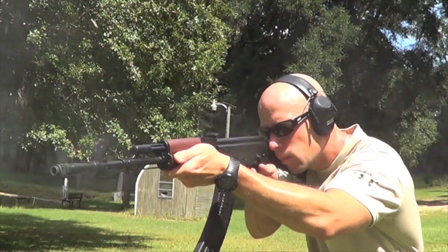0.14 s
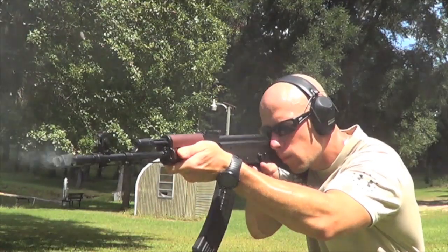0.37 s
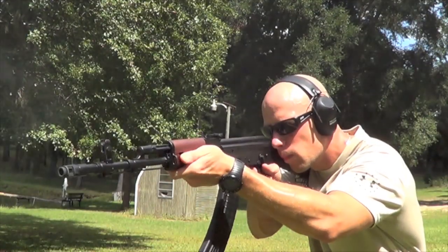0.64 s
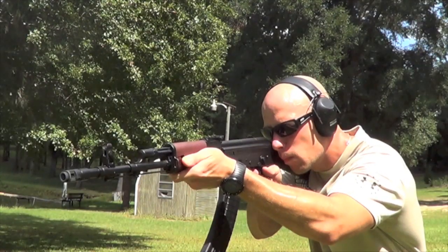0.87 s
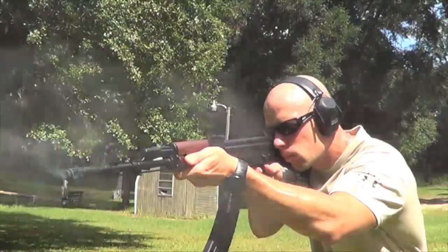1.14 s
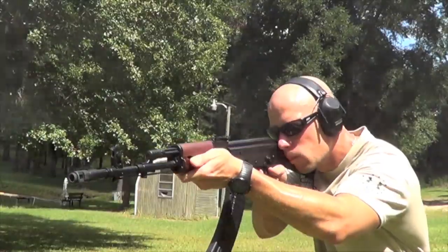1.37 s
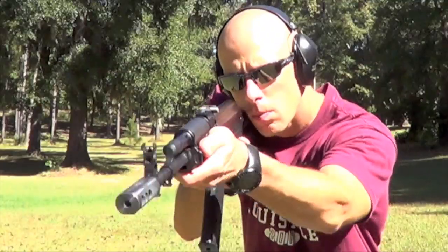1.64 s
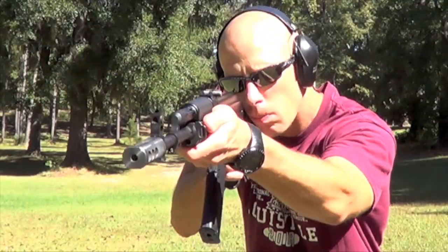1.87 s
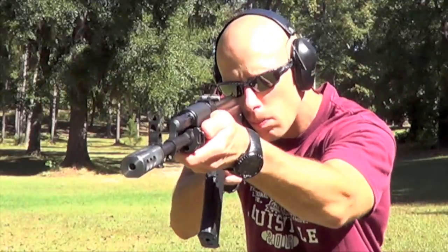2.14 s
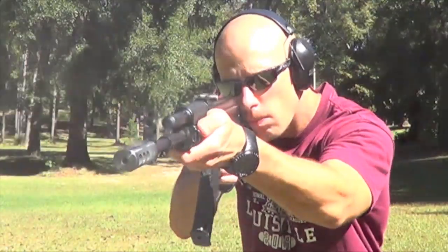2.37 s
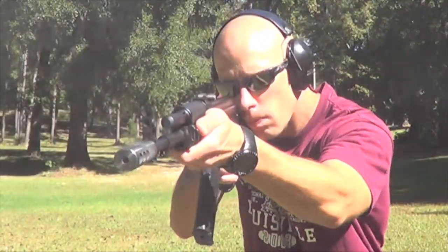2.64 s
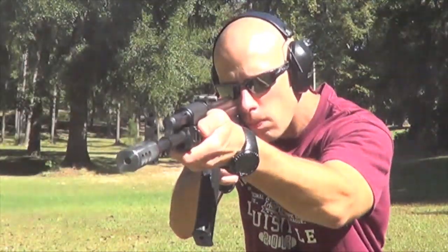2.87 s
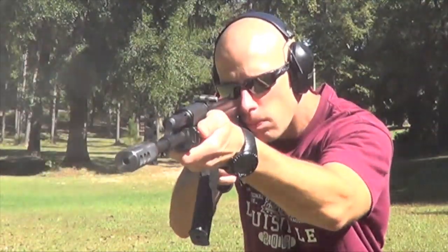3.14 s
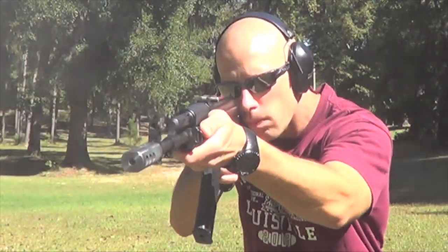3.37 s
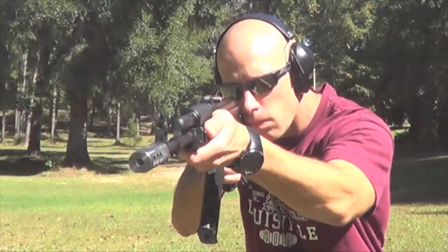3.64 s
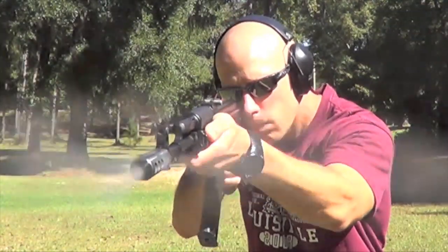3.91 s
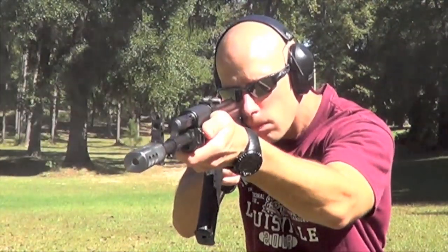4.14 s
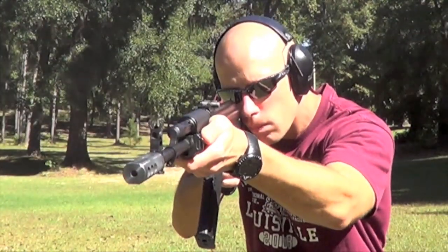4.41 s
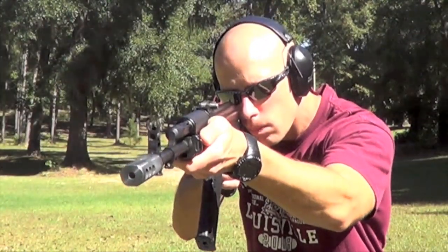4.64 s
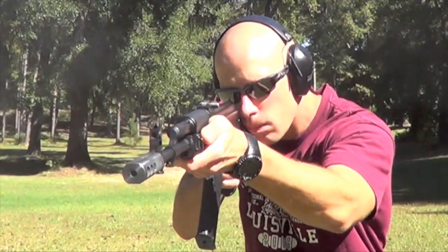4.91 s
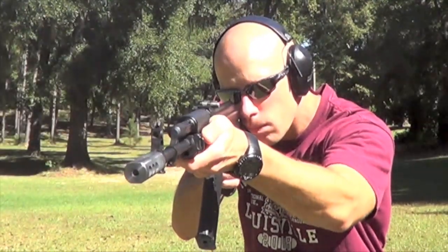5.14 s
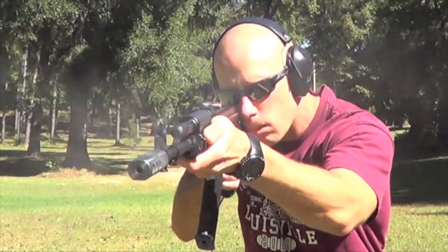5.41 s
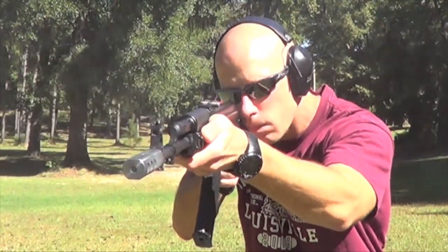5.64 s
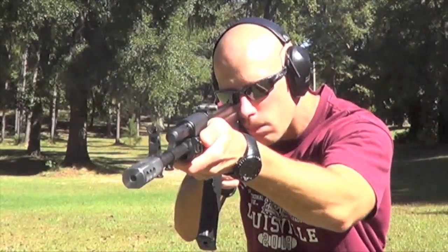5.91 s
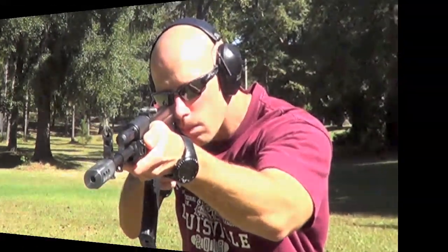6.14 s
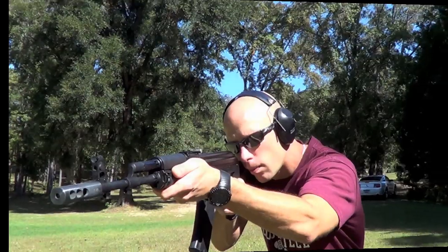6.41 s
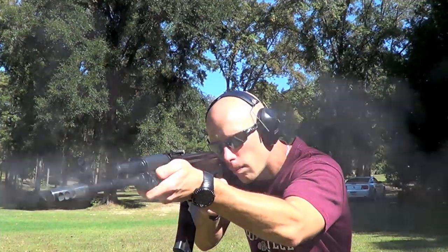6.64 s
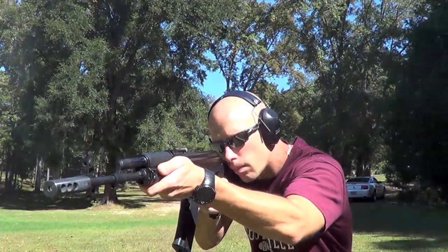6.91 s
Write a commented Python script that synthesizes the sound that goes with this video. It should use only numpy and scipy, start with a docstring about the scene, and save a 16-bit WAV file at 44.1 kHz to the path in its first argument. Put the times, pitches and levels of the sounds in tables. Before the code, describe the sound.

The sound begins inside the fading echo of a rifle shot, with a small steel click. Shots crack at about 0.24 and 0.47 s, then 1.1 and 1.3 s. Each is a tiny hammer click and bright, ragged gas burst, followed within a tenth of a second by hissy steel action clacks, dull slaps and a long woodland echo. Around 1.6 s the view fades to another; a crisp handling clack at 1.74 s echoes softly. Pairs follow at 2.36 and 2.56, then 3.11 and 3.34 s, with singles at 4.08, 4.84 and a stronger one at 5.53 s. Small trigger clicks punctuate gaps. Another fade spans 6.1-6.55 s, with a metal clack, quiet air, soft bumps and faint falling chirps near 6.7 s. A final shot at 6.8 s rings away. The camera's gain ducks at blasts and climbs afterward, sustaining the echoes.

```python
"""Rifle shots on a lawn among trees

A rifle fires quick single shots, heard from three camera set-ups joined by fades. Each shot is a
hammer click and a burst of gas made from coloured noise, then short slaps and a long echo from the woods.
Steel parts clack between shots, as noise through resonances; soft low bumps, a bird and quiet air lie behind.
The camera's gain control drops at loud sounds and climbs back, which holds the dying echo level."""
import sys
import numpy as np
from scipy import signal
from scipy.fft import rfft, irfft, next_fast_len
from scipy.io import wavfile
from scipy.ndimage import uniform_filter1d, map_coordinates

SR = 44100
rng = np.random.default_rng(int(sys.argv[2]) if len(sys.argv) > 2 else 0)


def gain_from_db(level_db):
    """Turn a decibel level (scalar or array-like) into a linear amplitude factor."""
    decades = np.asarray(level_db, float) / 20
    return 10 ** decades


def file_out(sig):
    """Save sig as 16-bit WAV at sys.argv[1]."""
    # one column per channel
    cols = np.atleast_2d(sig).T
    # limit, then scale
    lim = np.clip(cols, -1, 1)
    pcm = np.round(lim * 32767).astype(np.int16)
    wavfile.write(sys.argv[1], SR, pcm)


N = 310023  # length of the scene in samples


# Throughout, k is the number of the camera set-up: 0, 1 or 2.
# Levels are those before the gain control.


def unit(x):
    """Scales a sound to rms 1."""
    return x / np.sqrt(np.mean(x ** 2) + 1e-20)


def along(points, hz):
    """Reads a (frequency, value) curve on a log frequency axis."""
    f, v = np.transpose(points)
    return np.interp(np.log(hz + 1), np.log(f + 1), v)


def colour(points):
    """Turns a (frequency, level) curve into a gain for each frequency."""
    return lambda hz: gain_from_db(along(points, hz))


def add(track, s, sound):
    """Mixes a stereo sound in at time s, dropping what falls outside the scene."""
    at = round(s * SR)
    part = sound[:, max(-at, 0):N - at]
    track[:, max(at, 0):max(at, 0) + part.shape[1]] += part


# How alike left and right are: (frequency [Hz], likeness [0 to 1])
LIKENESS = [(30, .2), (150, 0.86), (400, 0.7), (1000, 0.62), (2400, 0.71), (6000, 0.53), (9000, 0.68),
            (11000, 0.99), (15000, .995)]
# Left over right, for each set-up: (frequency [Hz], level [dB])
LEFT_OVER_RIGHT = [
    [(60, -0.5), (240, 3.5), (950, 4.5), (3770, 1.5), (15000, 0.5)],
    [(60, -0.5), (240, 2), (950, 1.5), (3770, 0.5), (15000, 1)],
    [(60, 2), (380, -1), (2380, 1), (15000, 1.5)],
]
# How much of the echo is the same at every shot: (frequency [Hz], share of power [0 to 1])
REPEATED_SHARE = [(200, .9), (1200, .8), (2500, .4), (5000, 0)]


def hiss(k, size, gain, place=None):
    """Coloured stereo noise of rms 1, partly alike left and right; its bass may repeat a given noise."""
    m = next_fast_len(size)
    hz = np.fft.rfftfreq(m, 1 / SR)
    white = rfft(rng.standard_normal((2, m)))
    if place is not None:
        same = along(REPEATED_SHARE, hz)
        white = np.sqrt(same) * rfft(place[:, :m]) + np.sqrt(1 - same) * white
    # the more alike the sides, the less of the second noise is used
    turn = np.arccos(np.clip(along(LIKENESS, hz), -1, 1)) / 2
    middle, side = white * gain(hz) * [np.cos(turn), np.sin(turn)]
    tilt = gain_from_db(along(LEFT_OVER_RIGHT[k], hz) / 2)
    stereo = irfft([(middle + side) * tilt, (middle - side) / tilt], m)
    return unit(stereo[:, :size])


# The shots: (gas burst time [s], burst level [dB], echo level [dB], echo midrange lift [dB],
# bolt level offset [dB])
SHOTS = [(-.28, 12, -1, -2.5, 0), (.240, -0.5, -11.5, -1, -8), (0.4746, 6.5, -4, 0.5, 3.5),
         (1.0942, 3.5, -8.5, 0, -1), (1.304, 5, -6.5, 2, 0), (2.3644, 2.5, -6, -1, 0),
         (2.5628, 7.5, -3, -1, 2.5), (3.1084, 6.5, -7.5, 6, -1), (3.3414, 6, -8, -1, -4),
         (4.0824, 5, -7, 2.5, -1.5), (4.840, 4, -7, 1, 0.5), (5.5299, 9, -5, 4.5, 1),
         (6.805, 6, -6.5, 1, 4)]


def shots(track, k, place):
    """Hammer, then gas a few milliseconds later, then the woods and near surfaces answer."""
    for s, gas_db, echo_db, lift_db, _ in SHOTS:
        if belongs(k, s):
            add(track, s - 0.0077, hammer(k))
            add(track, s, gain_from_db(gas_db) * gas(k))
            add(track, s, gain_from_db(echo_db) * echo(k, place, lift_db))
            slaps(track, k, s, echo_db)


# Colour of the gas: (frequency [Hz], relative level per Hz [dB])
GAS_COLOUR = [(35, -41.5), (100, -12.5), (600, -4.5), (1500, -6), (4000, -9.5), (6000, -5), (9000, 0),
              (13300, -5), (15300, -12), (16000, -25)]


def gas(k):
    """The gas bursts out as bright noise with a fast fall, a slower tail and a ragged loudness."""
    t = np.arange(SR // 4) / SR
    ragged = gain_from_db(2.3 * map_coordinates(rng.standard_normal(100), [t * 300]))
    vent = np.minimum(0.34 + t / 0.024, 1)  # the gas takes a moment to vent fully
    fast_fall = gain_from_db(-60 * np.maximum(t - 0.009, 0) / 0.016)
    slow_fall = gain_from_db(-0.5 - 60 * t / 0.32)
    return hiss(k, len(t), colour(GAS_COLOUR)) * vent * (fast_fall + slow_fall) * ragged


# Colour of the hammer: (frequency [Hz], relative level per Hz [dB])
HAMMER_COLOUR = [(200, -17), (1000, 8.5), (4000, 2.5), (12000, 6), (16000, 7.5)]
# Hammer fall, one for each set-up: level [dB]
HAMMER_LEVEL = [-16, -9.5, -12]


def hammer(k):
    """The falling hammer is a tiny puff of noise with a weaker, quickly dying ring."""
    t = np.arange(SR // 4) / SR
    click = np.exp(-((t - 0.003) / 0.0014) ** 2)
    ring = 0.22 * (t > 0.003) * gain_from_db(-60 * t / 0.035)
    return gain_from_db(HAMMER_LEVEL[k]) * hiss(k, len(t), colour(HAMMER_COLOUR)) * (click + ring)


# Echo colour before the midrange lift and the dying away, for each set-up:
# (frequency [Hz], relative level per Hz [dB])
WOODS_COLOUR = [
    [(18, -64.5), (30, -38), (161, -16.5), (449, -7.5), (486, -3), (740, -5.5), (1010, -11), (1630, -12),
     (4910, -18), (8980, -18), (13300, -31), (16000, -73)],
    [(18, -63), (30, -65), (100, -17.5), (180, -9.5), (400, -4), (800, -2), (1800, -8), (3000, -12),
     (4300, -12.5), (5200, -15.5), (7500, -14.5), (10000, -21.5), (13000, -38), (16000, -70)],
    [(18, -74), (30, -37), (233, -9), (287, -9.5), (801, -4.5), (962, -3.5), (1760, -10.5), (8740, -18.5),
     (14000, -41.5), (16000, -63)],
]
# How fast the echo dies: (frequency [Hz], time to fall 60 dB [s])
DYING = [(60, 2.4), (300, 1.52), (800, 3.15), (2000, 2), (4200, 1.35), (5200, 1.09), (7000, 0.93),
         (10000, 0.69), (14000, 0.73)]
# How the echo arrives, near slaps first, then the woods, for each set-up:
# (time after the shot [s], level [dB])
ARRIVAL = [
    [(0, -3.5), (.03, -5), (.055, -8.5), (.07, 0), (.085, -12), (.105, -2.5), (.16, -3.5)],
    [(0, -17), (.03, -6.5), (.045, -11.5), (.06, -3), (.09, -3.5), (.13, 0), (.2, -2.5)],
    [(0, -33), (.025, -4), (.04, -5), (.06, -5), (.078, -8), (.09, 0), (.16, -1)],
]


def echo(k, place, lift_db, lift_hz=2300, patchy_db=1.2):
    """The surroundings answer in slaps and a swell of patchy noise, each pitch dying at its own pace."""
    def gain(hz):
        lift = np.exp(-(np.log2((hz + 1) / lift_hz) / 0.97) ** 2)  # width in octaves
        return gain_from_db(along(WOODS_COLOUR[k], hz) + lift_db * lift)

    hz, t, z = signal.stft(hiss(k, 2 * SR, gain, place), SR, nperseg=256)
    patches = uniform_filter1d(rng.standard_normal(z.shape[1:]), size=12, axis=0)
    patches = unit(uniform_filter1d(patches, size=4, axis=1))
    fall_db = 60 * (t - 0.2) / along(DYING, hz)[:, None]
    tail = signal.istft(z * gain_from_db(patchy_db * patches - fall_db), SR, nperseg=256)[1]
    arrival_db = np.interp(np.arange(tail.shape[1]) / SR, *np.transpose(ARRIVAL[k]))
    return tail * gain_from_db(arrival_db)


def trees(grain_db=2.5, grains_per_s=400, grain_fade_s=0.5):
    """Noise shared by the echoes of one set-up: near trunks make it lumpy, far ones merge smoothly."""
    t = np.arange(3 * SR) / SR
    lumps = map_coordinates(rng.standard_normal(2000), [t * grains_per_s])
    lumps_db = grain_db * np.exp(-t / grain_fade_s) * lumps
    return unit(rng.standard_normal((2, len(t))) * gain_from_db(lumps_db))


# The blast thrown back by ground, shed and near trunks, for each set-up:
# (time after the shot [s], level over the echo before a shared 2 dB rise [dB])
SLAPS = [
    [(.0045, -5), (.067, 4.5), (.073, 5), (.108, 4), (.121, 5), (.128, 4.5), (.135, 3), (.152, 6.5),
     (.168, 5.5), (.19, 5)],
    [(.0055, 1.5), (.012, 4.5), (.054, 8), (.061, 1), (.073, 2.5), (.095, 7.5), (.103, 8), (.165, 6),
     (.184, 2.5)],
    [(.006, 1), (.012, 2), (.036, 12), (.044, 12), (.053, 8), (.092, 7), (.1, 1), (.16, -1), (.2, 1)],
]
# Pitch of the slaps, one for each set-up: frequency [Hz]
SLAP_PITCH = [730, 842, 560]


def slaps(track, k, s, echo_db, rise_s=0.00084):
    """Each near surface sends back one short dull pulse, a quickly swelling and fading tone."""
    t = np.arange(SR // 50) / SR
    u = t / rise_s
    pulse = u * np.exp(1 - u) * np.sin(2 * np.pi * SLAP_PITCH[k] * t) * np.ones((2, 1))
    for later, db in SLAPS[k]:
        add(track, s + later - rise_s, gain_from_db(2 + echo_db + db) * pulse)


# The bolt cycle after every shot, for each set-up: (time after the shot [s],
# level before the shot's offset [dB], time to fall 60 dB [s], lowest [Hz], highest [Hz])
BOLT = [
    [(.05, -2, .09, 6000, 14000), (.077, -4, .08, 6000, 16000), (.084, 2, 0.043, 6000, 16000),
     (.147, -6, 0.01, 5000, 9000)],
    [(.069, -1, .08, 6200, 16000), (.077, 4, 0.044, 6200, 16000), (.142, -3, 0.034, 5000, 8000)],
    [(.072, 0.5, .03, 6000, 16000), (.078, 2, .044, 6000, 14000)],
]
# The trigger let forward: (time [s], level [dB])
TRIGGER_RESETS = [(.005, -9), (2.755, -5), (3.543, -12), (4.375, -13), (5.129, -11.5), (5.8, -12)]
# The rifle handled between shots; the two long soft rows are the click's echo from the woods:
# (time [s], level [dB], time to fall 60 dB [s], lowest [Hz], highest [Hz])
HANDLING_AND_ECHO = [(1.7405, -16, 0.03, 3480, 16000), (1.7428, -6.5, 0.024, 3480, 16000),
                     (1.749, -5, 0.031, 900, 15500), (1.754, -10, 0.043, 3500, 15300),
                     (1.77, -32, 0.33, 6000, 11900), (1.795, -30, 0.26, 4700, 11900),
                     (1.885, -34, .04, 5500, 9000), (1.891, -30, 0.022, 4800, 7000),
                     (1.903, -40, .04, 5500, 8000), (2.321, -32.5, 0.038, 1500, 8950),
                     (2.903, -22, 0.033, 6000, 10000), (5.768, -16, .04, 6140, 11000),
                     (6.1393, -13, 0.054, 4500, 16540)]


def steel_parts(track, k):
    """Steel knocks at the bolt, trigger and in handling; one handling click echoes from the woods."""
    cycles = [(s + later, db + bolt_db, *ring)
              for s, *_, bolt_db in SHOTS for later, db, *ring in BOLT[k]]
    cycles = [row for row in cycles if row[0] > 0]
    resets = [(s, db, 0.034, 7000, 16000) for s, db in TRIGGER_RESETS]  # columns as in HANDLING_AND_ECHO
    for row in cycles + resets + HANDLING_AND_ECHO:
        if belongs(k, row[0]):
            clack(track, k, *row)


# Resonances of the rifle steel: (frequency [Hz], width [Hz], level before random strength [dB])
STEEL = [(1880, 370, -18), (4900, 450, -27), (6800, 1200, 1.5), (10660, 4500, -5.5)]


def clack(track, k, s, db, t60, low_hz, high_hz):
    """A rattle, or its soft echo: noise through the steel's broad resonances, each at a new strength."""
    t = np.arange(SR // 4) / SR
    struck = gain_from_db(2 * rng.standard_normal(len(STEEL)))

    def steel(hz):
        band = 1 / (1 + (low_hz / (hz + 1)) ** 6) / (1 + (hz / high_hz) ** 8)
        rings = sum(strength * gain_from_db(level) / (1 + (2 * (hz - centre) / width) ** 2)
                    for strength, (centre, width, level) in zip(struck, STEEL))
        return band * (0.5 + rings)

    start = 1 - np.exp(-t / t60 ** 2 * 4)  # long sounds start softly
    add(track, s, gain_from_db(db - 60 * t / t60) * start * hiss(k, len(t), steel))


# Soft low bumps on the microphone: (time [s], level before random spread [dB])
BUMPS = [(6.555, -43), (6.58, -42), (6.712, -43), (6.758, -41)]


def bumps(track):
    """The membrane makes about two slow swings, unequal left and right."""
    t = np.arange(round(0.028 * SR)) / SR
    swing = np.hanning(len(t)) * np.sin(2 * np.pi * 70 * t)
    for s, db in BUMPS:
        add(track, s, gain_from_db(db + 3.7 * rng.standard_normal((2, 1))) * swing)


# A far bird: (time [s], starting pitch [Hz], level [dB])
CHIRPS = [(6.655, 4250, -59), (6.703, 4400, -54), (6.752, 4400, -52)]


def bird(track):
    """Short whistles whose pitch falls a little, the same in both ears."""
    t = np.arange(round(0.028 * SR)) / SR
    for s, hz, db in CHIRPS:
        whistle = np.hanning(len(t)) * np.sin(2 * np.pi * hz * t * (1 - 0.9 * t))
        add(track, s, gain_from_db(db) * whistle * np.ones((2, 1)))


# Colour of the quiet air, first for set-ups 0 and 1, then for 2:
# (frequency [Hz], relative level per Hz [dB])
AIR_COLOUR = [
    [(25, -11), (100, -7), (250, -10.5), (500, -11), (1500, -16.5), (4000, -19.5), (9000, -25.5),
     (14500, -37.5), (16000, -31)],
    [(25, 5), (80, -7.5), (250, -8.5), (600, -4.5), (1200, -11.5), (3000, -19), (9000, -20.5),
     (16000, -32.5)],
]
# Quiet air, one for each set-up: level [dB]
AIR_LEVEL = [-40.5, -49, -43.5]


def quiet_air(k):
    """The quiet background is steady coloured noise."""
    return gain_from_db(AIR_LEVEL[k]) * hiss(k, N, colour(AIR_COLOUR[k // 2]))


def camera(x, hold_db=-14, climb_db_per_s=90, sense_s=0.0056, attack_s=0.0023,
           keen=0.19, ahead_s=0.0018, top=0.73):
    """Gain control: follows the loudest recent level, climbs back steadily; overshoot clips softly."""
    heard = x + keen * np.diff(x, prepend=0)  # keener on treble, so bright bursts duck the boom
    power = np.mean(heard ** 2, axis=0)
    level_db = 10 * np.log10(np.abs(lag(power, sense_s)) + 1e-12)
    t = np.arange(N) / SR
    ramp = climb_db_per_s * t
    held_db = np.maximum.accumulate(level_db + ramp) - ramp
    cut_db = lag(np.maximum(held_db - hold_db, 0), attack_s)
    y = x * gain_from_db(-np.interp(t + ahead_s, t, cut_db))  # read a little ahead, so the cut comes early
    return y / (1 + np.abs(y / top) ** 3) ** (1 / 3)


def lag(v, s):
    """A follower with time constant s, started from the average of the first moments."""
    share = 1 / (1 + s * SR)
    rest = np.mean(v[:SR // 50])
    return rest + signal.lfilter([share], [1, share - 1], v - rest)


# Fades, one row for each set-up:
# (fade-in start [s], full [s], fade-out start [s], silent [s])
FADES = [(-1, -.9, 1.56, 1.654), (1.652, 1.78, 6.08, 6.6), (6.1, 6.55, 8, 9)]


def fade(k):
    """Loudness of one set-up over time, rising and falling in straight lines."""
    return np.interp(np.arange(N) / SR, FADES[k], [0, 1, 1, 0])


def belongs(k, s):
    """Gives each event to one set-up: after the one before is silent, until its own silence."""
    return (k == 0 or s > FADES[k - 1][3]) and s < FADES[k][3]


def scene():
    """Each set-up passes its own gain control, then the set-ups are faded together."""
    mix = np.zeros((2, N))
    for k in range(len(FADES)):
        track = quiet_air(k)
        shots(track, k, trees())
        steel_parts(track, k)
        if k == 2:
            bumps(track)
            bird(track)
        mix += camera(track) * fade(k)
    return mix


def low_pass(x):
    """Removes everything above the highest recorded frequency."""
    return signal.sosfilt(signal.butter(12, 16810, fs=SR, output="sos"), x)


def record(dry):
    """The camera cuts deep bass and the highest treble."""
    bass_cut = signal.butter(1, 50, "high", fs=SR, output="sos")
    treble_cut = signal.cheby1(10, 0.5, 15700, fs=SR, output="sos")
    mix = signal.sosfilt(treble_cut, signal.sosfilt(bass_cut, dry))
    return low_pass(mix)


dry = scene()
out = record(dry)
file_out(out)
```